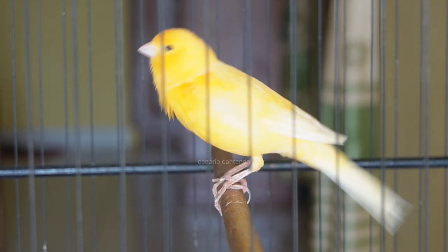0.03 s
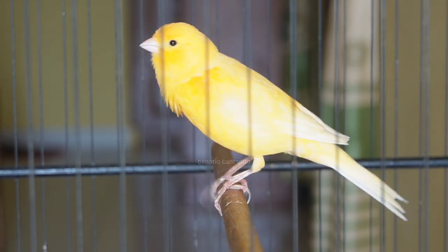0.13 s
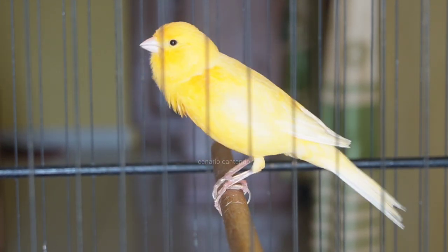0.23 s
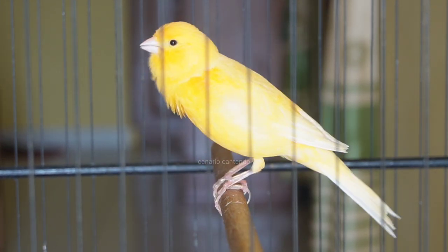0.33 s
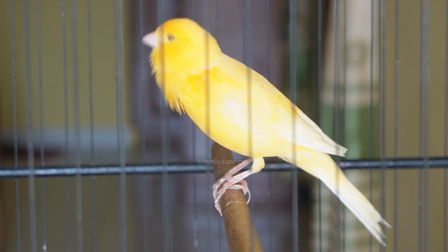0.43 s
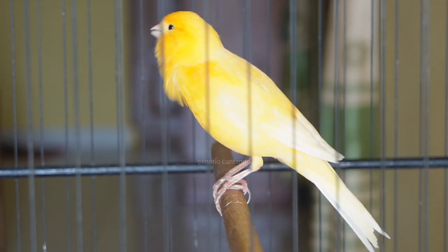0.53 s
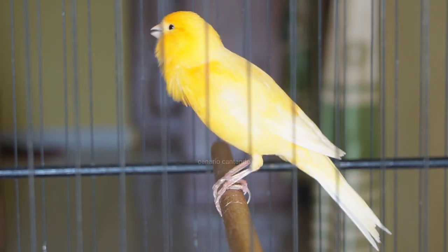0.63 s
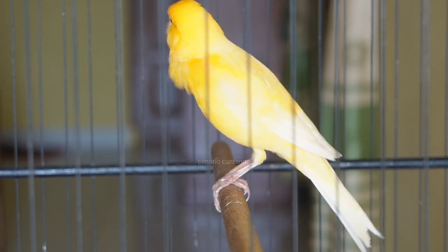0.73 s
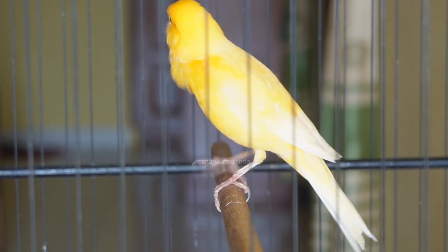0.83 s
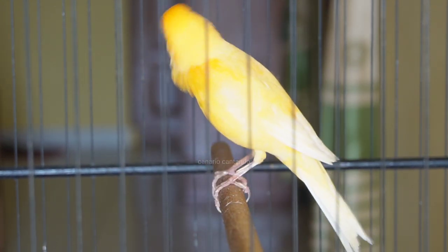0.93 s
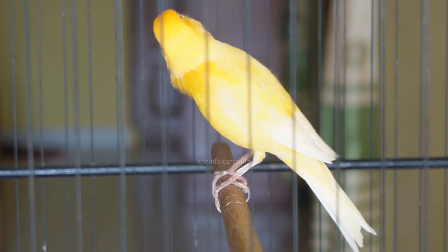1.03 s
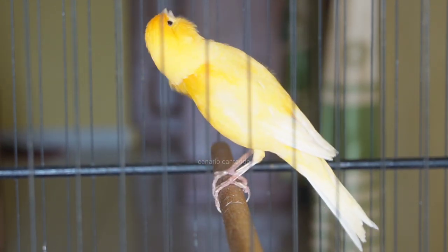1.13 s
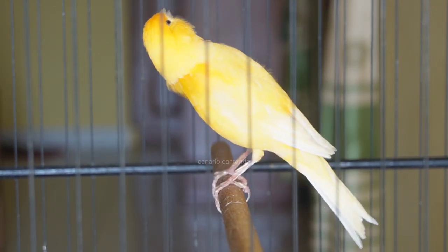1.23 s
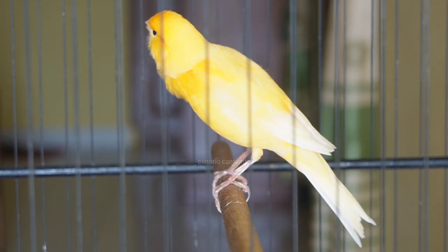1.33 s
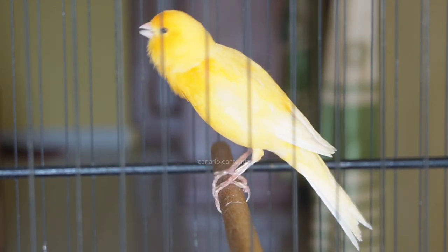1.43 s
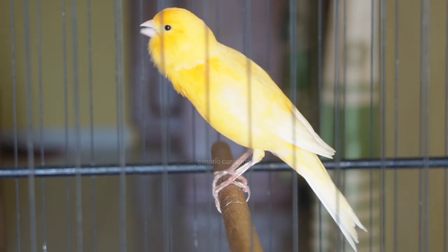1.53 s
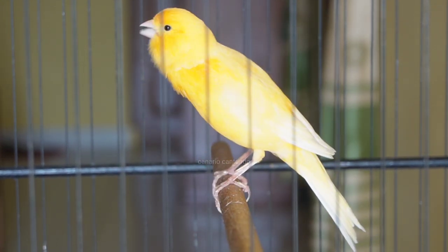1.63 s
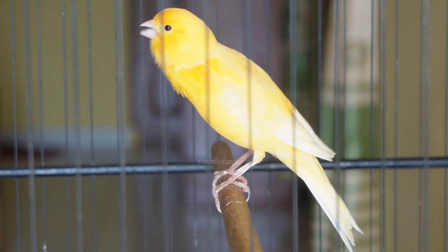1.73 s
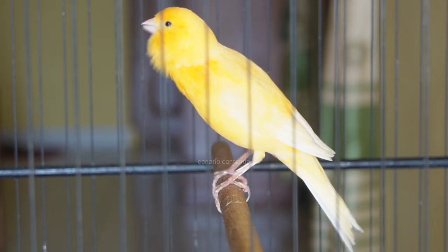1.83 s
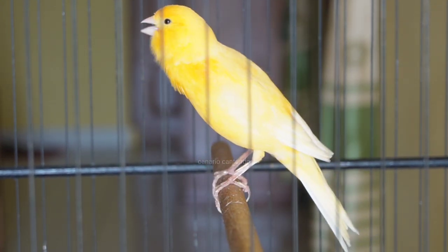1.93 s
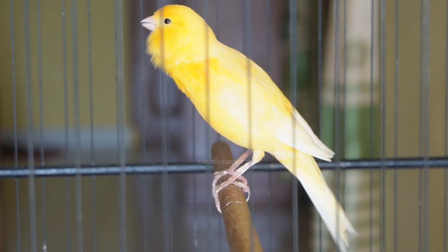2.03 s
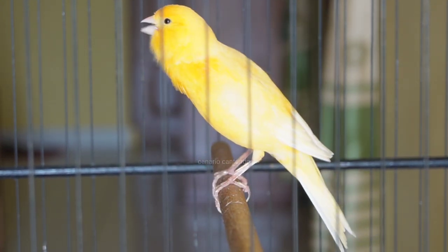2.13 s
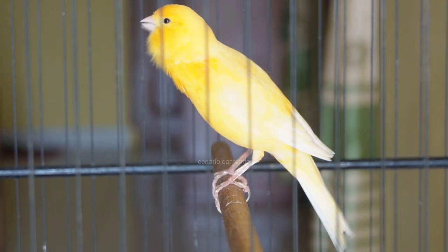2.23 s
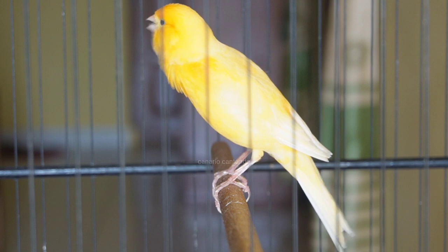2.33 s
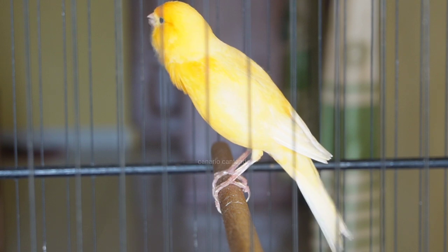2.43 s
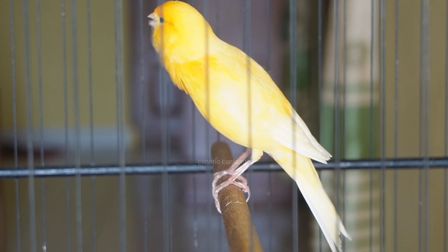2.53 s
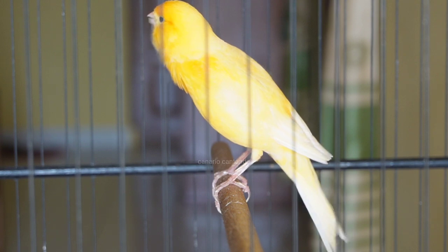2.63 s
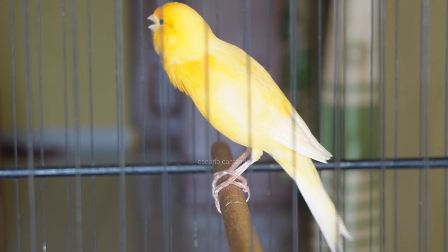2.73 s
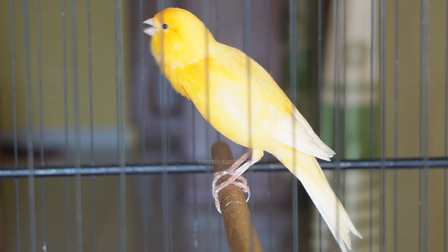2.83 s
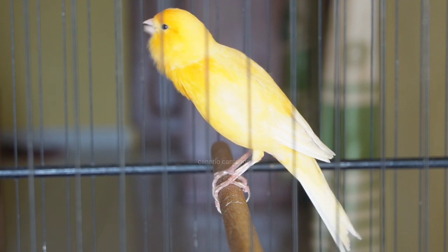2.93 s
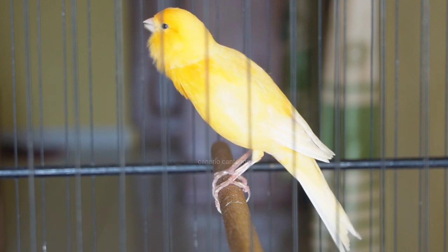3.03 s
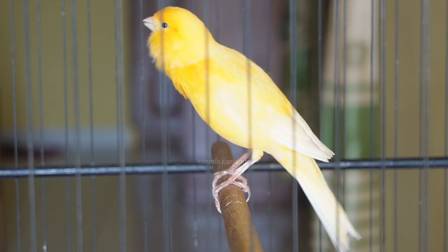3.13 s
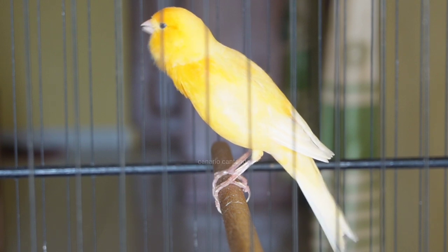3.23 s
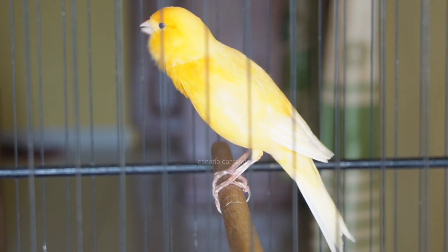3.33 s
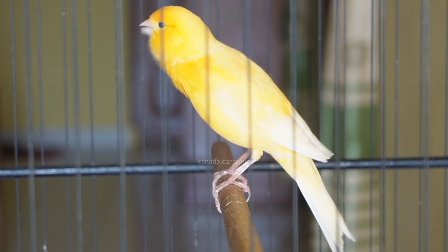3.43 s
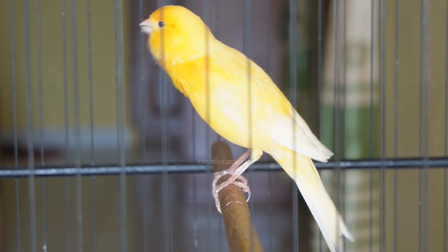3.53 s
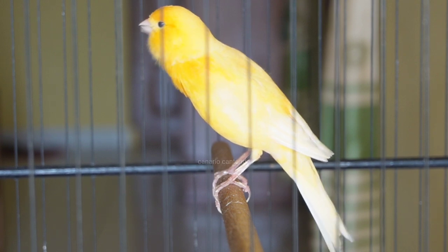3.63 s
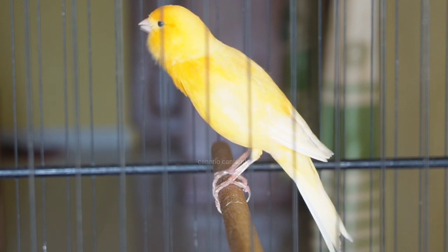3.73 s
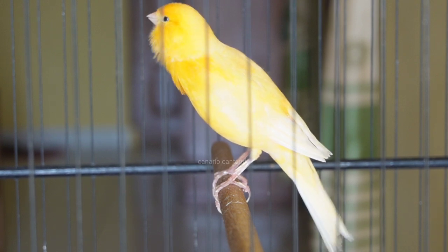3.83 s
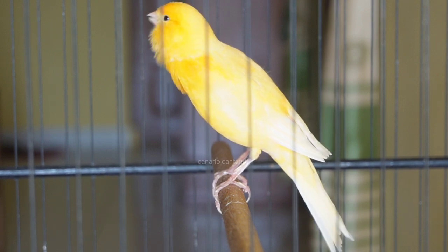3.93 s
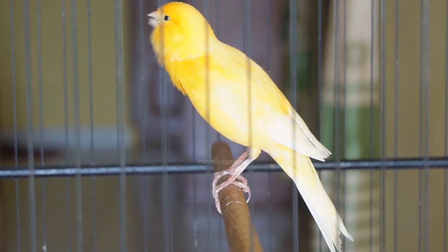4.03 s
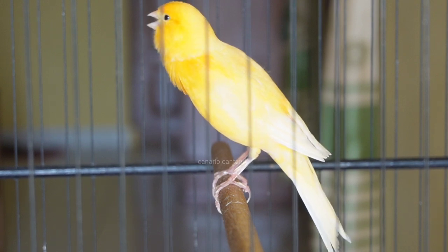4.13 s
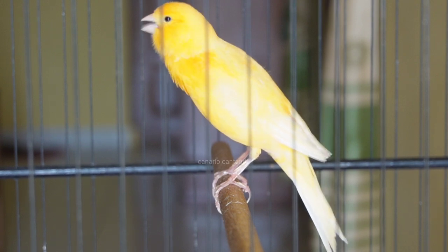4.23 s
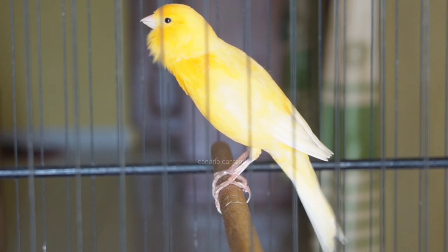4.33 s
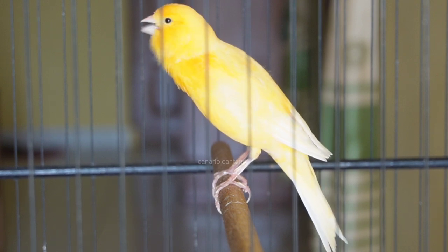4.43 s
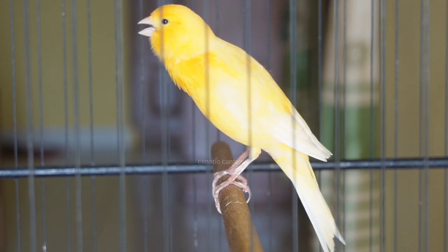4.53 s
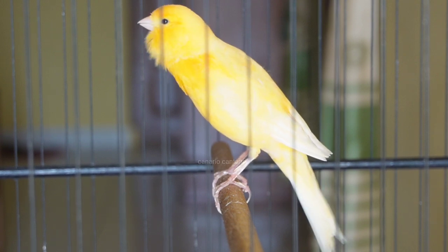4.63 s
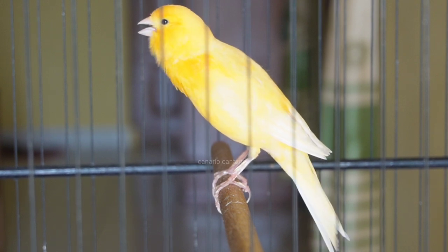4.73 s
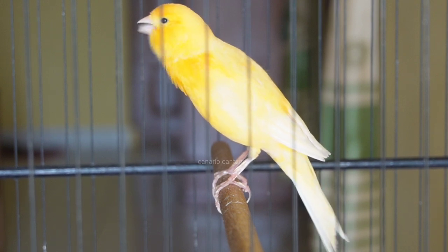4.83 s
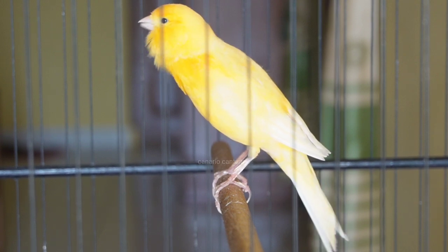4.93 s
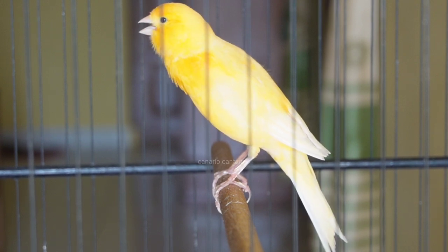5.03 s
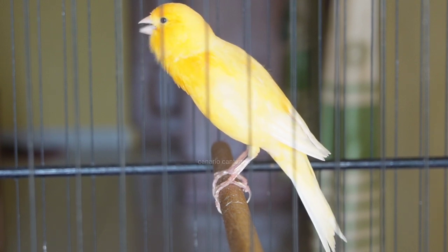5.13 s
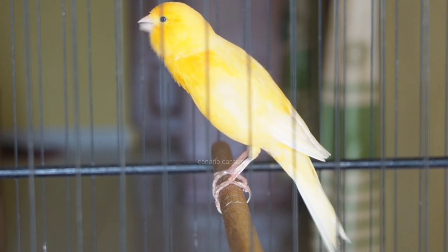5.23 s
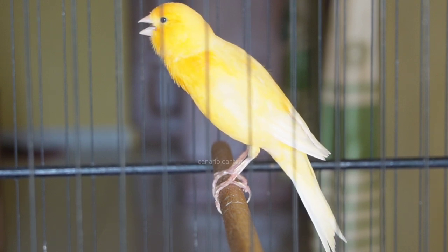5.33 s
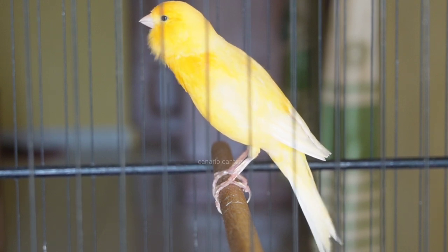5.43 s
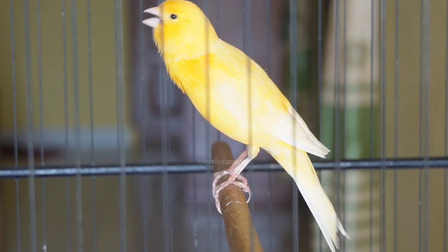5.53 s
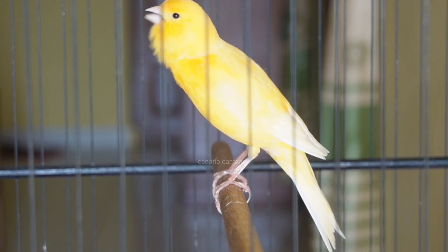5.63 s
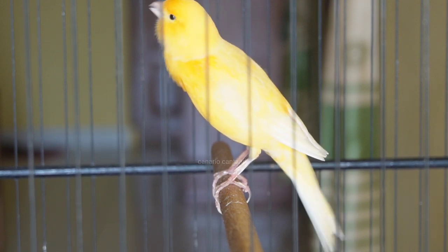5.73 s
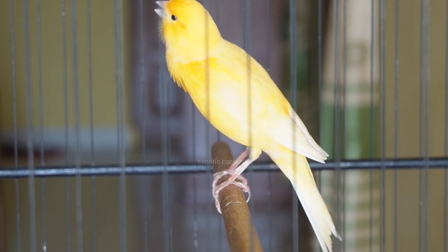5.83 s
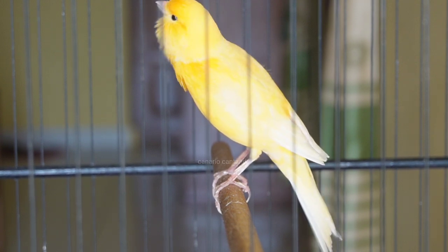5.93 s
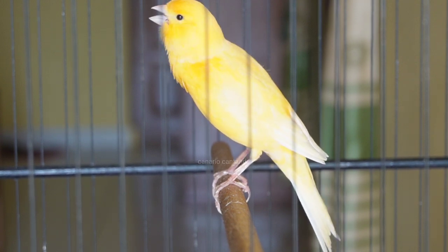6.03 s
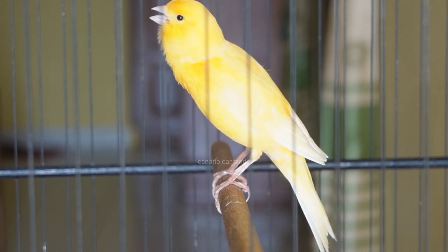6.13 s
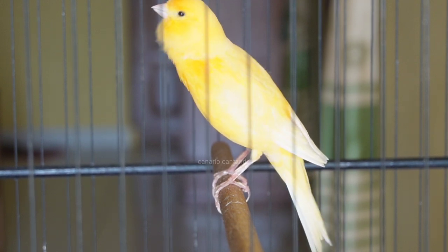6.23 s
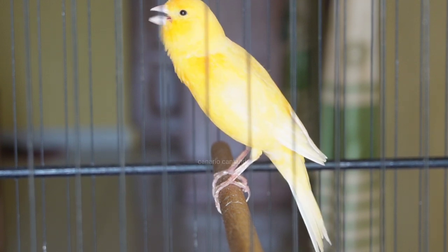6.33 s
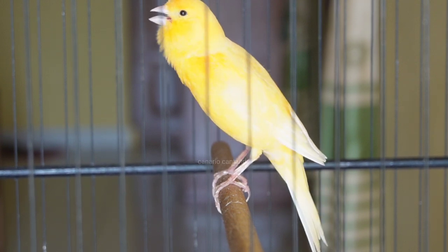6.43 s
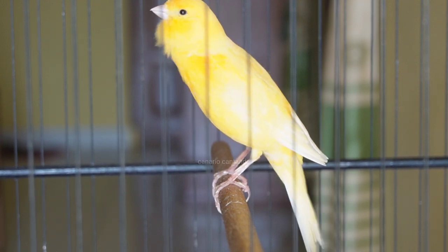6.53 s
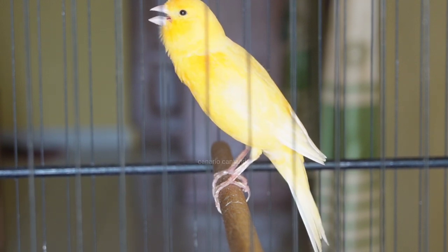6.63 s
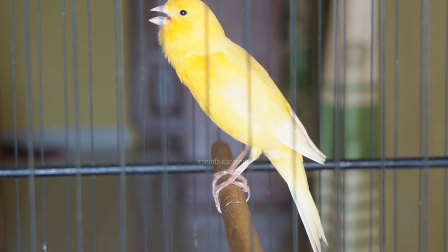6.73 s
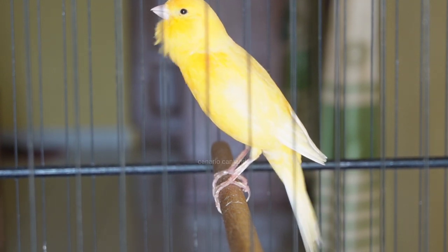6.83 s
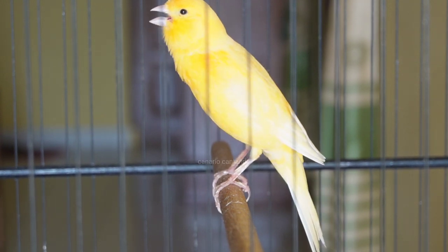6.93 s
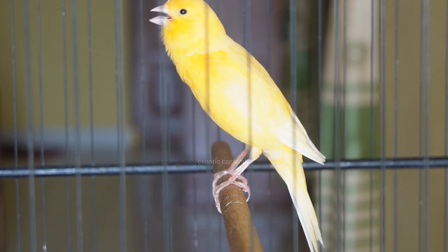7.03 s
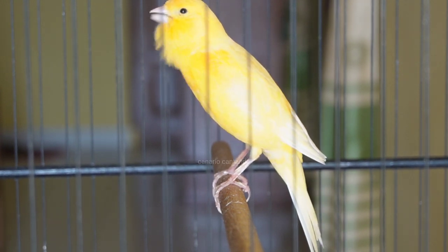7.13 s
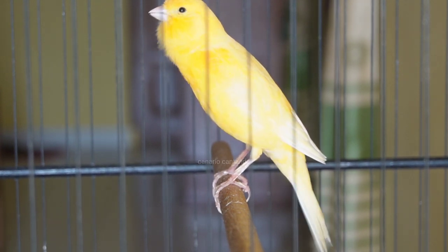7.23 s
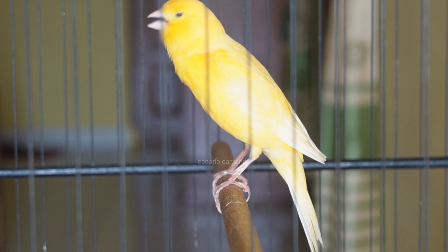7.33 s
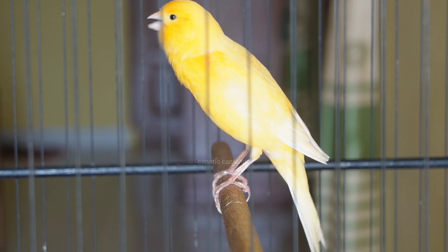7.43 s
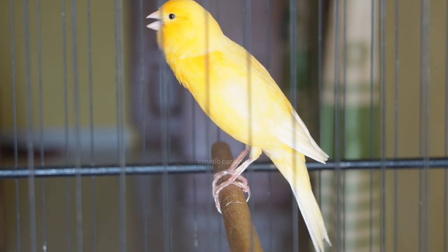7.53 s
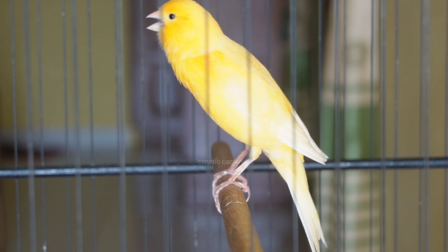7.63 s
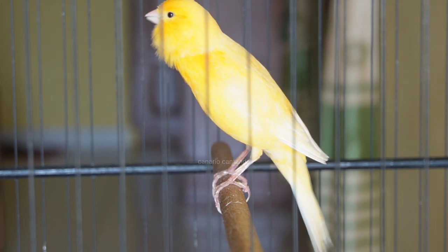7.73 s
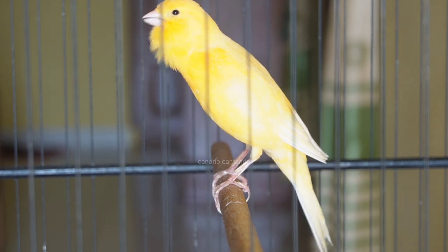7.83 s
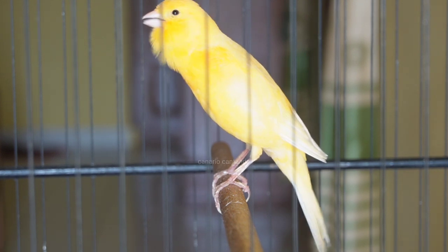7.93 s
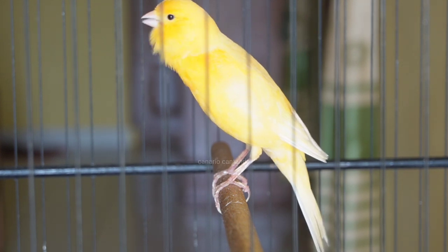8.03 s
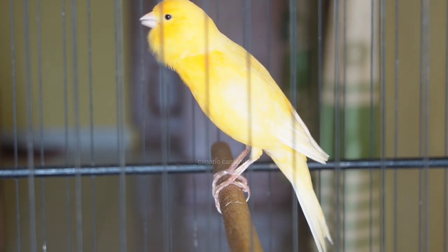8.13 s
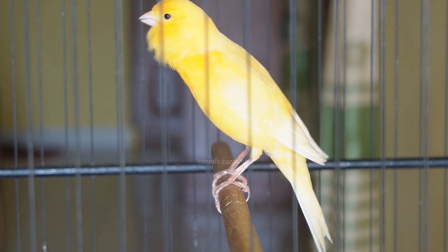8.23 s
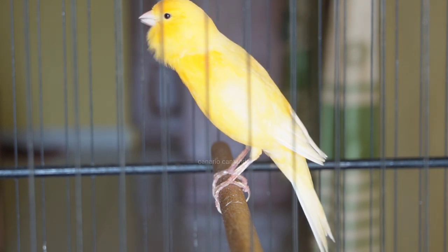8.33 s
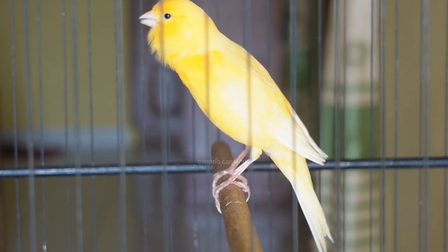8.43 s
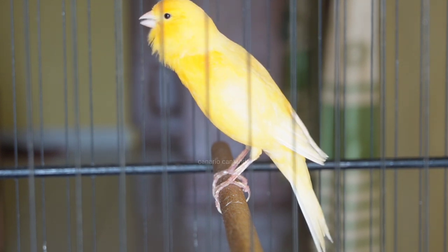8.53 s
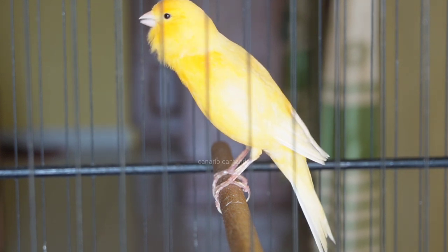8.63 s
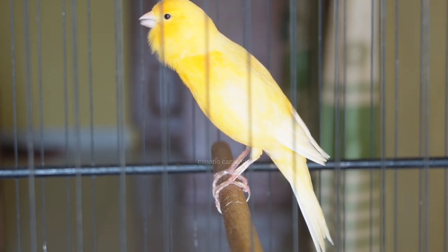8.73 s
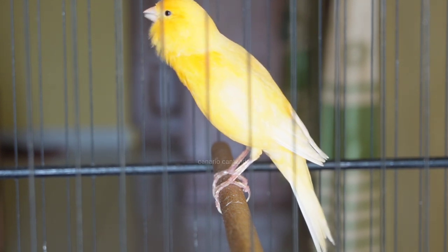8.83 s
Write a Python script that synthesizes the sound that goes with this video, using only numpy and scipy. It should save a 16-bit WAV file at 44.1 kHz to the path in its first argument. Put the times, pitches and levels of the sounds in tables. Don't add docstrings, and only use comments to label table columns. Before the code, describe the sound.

A caged canary sings close by in a small room: quick twitter, slowing roll of falling whistles, long swoops, two rises, fast trill.

```python
import sys
import numpy as np
from scipy import signal
from scipy.fft import rfft, irfft
from scipy.io import wavfile
from scipy.ndimage import uniform_filter1d, minimum_filter1d

SR = 44100
rng = np.random.default_rng(int(sys.argv[2]) if len(sys.argv) > 2 else 0)


def int16_out(signal):
    q = np.round(np.clip(np.atleast_2d(signal).T, -1, 1) * 32767)
    wavfile.write(sys.argv[1], SR, q.astype(np.int16))


def how_loud(loudness_db):
    steps = np.asarray(loudness_db, float) / 20
    return 10 ** steps


N = 392049

# (frequency [Hz], density [dB per Hz])
HOUSE_SPECTRUM = [(20, -25), (40, -14), (62, -5), (190, -1), (400, -8), (1000, -12), (4000, -18),
                  (15600, -35)]
# (frequency [Hz], likeness [0-1])
HOUSE_LIKENESS = [(25, .98), (60, .955), (125, .88), (250, .73), (500, .69), (1000, .75), (4000, .6),
                  (12000, .2)]
# (middle [s], length [s], level over the house noise [dB])
RUSTLES = [
    (0.333, 0.027, 1),
    (6.536, 0.07, 3),
    (7.58, 0.38, 1.5),
    (8.118, 0.035, 3),
]
# (start [s], length [s], frequency [Hz], level [dB], second partial re first [dB])
SQUEAKS = [
    (1.594, 0.16, 786, -67, 3),
    (1.712, .12, 883.6, -67, 10),
    (1.837, 0.584, 944.8, -54.5, -9),
    (6.477, 0.16, 1345, -61.5, -9.5),
    (7.485, 0.094, 958, -53.5, -19.5),
    (7.498, 0.29, 1294, -67.5, -23),
    (6.758, 0.54, 376, -55.5, -16.5),
]
# (left delay [s], left level [dB], right delay [s], right level [dB])
NEAR_ECHOES = [(.00064, -13, .00043, -13), (.001435, -4.5, .001412, -2.5), (.00216, -20, .00217, -13),
               (.00373, -14, .00373, -13), (.00563, -14, .0056, -24), (.00877, -9.5, .00877, -11),
               (.01072, -13, .00937, -14)]
# (frequency [Hz], decay time [s], level [dB], left-right likeness [0-1])
WALLS = [(1780, 0.576, -1, 0.9), (2574, 0.503, -3, 0.92), (3786, 0.4586, -4, 0.79),
         (4800, 0.4173, -0.5, 0.81), (7130, 0.309, 1.5, 0.46), (9840, 0.4, -2, 0.3), (13900, .3, 3.5, 0)]

# (multiple [1], colour as rows of (frequency [Hz], level at full effort [dB]))
OVERTONES = [
    (2, [(5000, -46), (7500, -39.5), (9500, -28), (11000, -29.5), (12300, -44), (13600, -33), (15500, -38.5)]),
    (3, [(7000, -40), (9500, -33.5), (11200, -40.5), (12200, -43), (15500, -37)]),
    (4, [(9000, -68.5), (13500, -61), (14800, -44), (15500, -50)]),
]
# (drop start [s], slide top [Hz], slide level [dB], drop level [dB])
TWITTER = [(0.329, 4705, -47.5, -37.5), (.369, 5500, -39, -28.5), (.412, 4800, -42.5, -29),
           (.455, 5700, -32.5, -27.5), (0.497, 6186, -29.5, -23.5), (0.54, 5900, -30, -23.5),
           (.581, 6480, -31, -22), (.625, 5950, -33, -27.5), (.669, 5970, -28.5, -21.5),
           (0.713, 6390, -30.5, -20.5), (.756, 5300, -28.5, -18.5), (.8, 5930, -29.5, -20.5),
           (0.843, 5500, -29.5, -19.5), (.889, 6020, -31, -20), (0.934, 5800, -30.5, -23),
           (.978, 3920, -39, -17)]
# (start [s], length [s], top pitch [Hz], peak level [dB])
QUICK_ROLL = [(1.01, .026, 6977, -27), (1.055, 0.0237, 7095, -24), (1.102, 0.0207, 6090, -25),
              (1.146, 0.0199, 7120, -22.5), (1.193, 0.0211, 6800, -19.5), (1.241, 0.0212, 6510, -20),
              (1.284, 0.02574, 7080, -17.5), (1.335, 0.0241, 6700, -22.5), (1.384, .021, 6470, -19),
              (1.431, 0.0194, 6990, -19.5), (1.481, 0.0226, 6540, -19.5), (1.523, .029, 7187, -20.5),
              (1.578, .024, 6600, -18.5), (1.625, 0.0276, 7274, -20), (1.673, 0.0271, 7120, -19),
              (1.731, 0.0275, 6915, -20), (1.785, 0.0311, 6895, -17.5)]
# (start [s], peak level [dB])
EVEN_ROLL = [(1.841, -21.5), (1.905, -20), (1.972, -19.5), (2.035, -17.5), (2.1, -19), (2.165, -19),
             (2.231, -18), (2.296, -17), (2.361, -16), (2.428, -19), (2.493, -16.5), (2.558, -16.5),
             (2.625, -18), (2.69, -17), (2.756, -16.5)]
# (start [s], length [s], peak level [dB])
SLOW_ROLL = [(2.824, 0.0557, -13.5), (2.908, 0.0596, -13.5), (2.993, 0.064, -12.5), (3.083, 0.0637, -13),
             (3.173, 0.0688, -11.5), (3.268, 0.06665, -12.5), (3.364, 0.0645, -10), (3.457, 0.0656, -11),
             (3.554, 0.0708, -8.5), (3.652, 0.0731, -12), (3.755, .072, -11), (3.858, 0.0804, -11.5),
             (3.973, 0.07765, -10), (4.087, 0.0791, -11), (4.196, 0.0986, -10), (4.336, 0.104, -10)]
# (time [s], bottom pitch [Hz], sag of mid-note under a straight fall [Hz])
ROLL_RANGE = [(0.999, 2934, 200), (1.299, 3400, 200), (1.8, 3300, 130), (1.83, 2350, 140.5),
              (2.78, 2360, 449), (2.81, 2380, -220), (3.449, 2440, -250), (3.559, 2170, -100),
              (4.35, 2020, -200)]
# (from [s], snap up [Hz], end sag [Hz], mid-fall pause [share of the fall],
# passband as rows of (pitch [Hz], level passed [dB]))
ROLL_THROATS = [
    (1, -1.5, 600.4, -0.018, [(2700, -6.5), (3200, 4.5), (3900, 6.5), (4400, 1), (5200, -10), (6200, -15), (7200, -1)]),
    (1.18, 5.5, 250, 0.0036, [(2800, 10), (3400, 0.5), (3900, 7), (4500, -4), (5200, -14), (6200, -15.5), (7200, -9)]),
    (1.835, 1301.5, 450, 0.0069, [(2000, -16.5), (2700, -1), (3100, 3.5), (3800, 2.5), (4600, -0.5), (5400, -11.5), (6300, -14.5), (7100, -24.5)]),
    (2.8, 399, 653, .012, [(1700, -22.5), (2300, -15.5), (2900, -3.5), (3800, -1.5), (4700, -1), (5500, -8.5), (6300, -19), (7200, -24.5)]),
]
# (start [s], length [s], top pitch [Hz], first slide if it took the whole note [Hz],
# hand-over [share of the note])
FALLS = [(4.479, 0.1015, 7047, 4290, 0.584), (4.624, 0.1111, 7218, 4457, 0.716),
         (4.784, 0.1079, 7246, 4250, 0.427), (4.943, 0.1132, 7014, 4430, 0.466),
         (5.163, 0.12405, 7010, 2500, 0.249), (5.347, 0.1829, 7780, 3478, 0.526),
         (5.582, 0.1935, 7674, 3220, 0.525), (5.837, 0.2121, 7698, 3418, 0.611),
         (6.112, .213, 7614, 4270, 0.57), (6.387, 0.2382, 7593, 4443, 0.573),
         (6.687, 0.2514, 7520, 4201, 0.792), (7.012, .257, 7759, 4582, .78)]
# (from [s], passband as rows of (pitch [Hz], level passed [dB]))
FALL_THROATS = [
    (4.4, [(2150, -12.5), (3000, -5), (3950, -2.5), (4750, -2), (5450, -12.5), (6200, -19.5), (6600, -29), (7100, -24)]),
    (5.1, [(2100, -17), (2900, -6.5), (3600, -2.5), (4500, 0), (5400, -10.5), (6200, -13.5), (6900, -20), (7600, -23)]),
    (6.3, [(2100, -20), (2900, -5.5), (3600, 1.5), (4600, -1), (5400, -6.5), (5800, -14), (6300, -18.5), (7500, -22)]),
]
# (start [s], length [s], first pitch [Hz], peak level [dB])
RISES = [
    (7.343, 0.184, 3150, -10),
    (7.573, .189, 3163, -10),
]
# (pitch [Hz], level passed [dB])
RISE_THROAT = [(2800, -9.5), (3850, -3), (4550, 0), (5450, -10), (6000, -7), (6270, -11.5)]
# (start [s], first pitch [Hz], peak level [dB])
TRILL = [(7.802, 2427, -12), (7.849, 2986, -9.5), (7.892, 2628, -10), (7.934, 2198, -9), (7.98, 2324, -7.5),
         (8.024, 2156, -8), (8.068, 2178, -7.5), (8.114, 2203, -7.5), (8.159, 2281, -6),
         (8.205, 2058, -4.5), (8.25, 2040, -5.5), (8.296, 1961, -5.5), (8.342, 1959, -3.5),
         (8.387, 2003, -5.5), (8.433, 2025, -6), (8.479, 2097, -5.5), (8.526, 2104, -6),
         (8.571, 2159, -5.5), (8.617, 2048, -4.5), (8.662, 2021, -5), (8.71, 2041, -5), (8.757, 1771, -5.5),
         (8.805, 2039, -4.5), (8.855, 1986, -4.5)]
# (pitch [Hz], level passed [dB])
TRILL_THROAT = [(1900, -27.5), (2500, -13), (3100, -5.5), (3500, -2.5), (3800, 7)]

SLIDE_HZ_PER_S, SLIDE_END_HZ, DROP_S, DROP_HZ = 190000, 3997, 0.0056, 1150
EVEN_NOTE_S, ROLL_TOP_HZ = 0.0415, 7154
FALL_BOTTOM_HZ, FALL_BEND, FALL_DIP_HZ = 2238, 1.2, 58.86
FALL_DB, FALL_SWELL_DB_PER_S = -8.5, 0.59
RISE_TOP_HZ, RISE_BEND, RISE_HOLD_S, RISE_SNAP_HZ = 6201, 2.4, 0.008, 500
TRILL_TOP_HZ, TRILL_CLIMB_S, TRILL_SPAN_HZ, TRILL_ROUND = 3715.2, 0.021, 1685, 0.25
TRILL_FADE_DB, TRILL_SNAP_HZ = 5.5, 148


def table(points, hz):
    rows = np.array(points, float)
    return np.interp(np.log(np.maximum(hz, 1)), np.log(rows[:, 0]), rows[:, 1])


def pair(length, like, gain):
    hz = np.fft.rfftfreq(length, 1 / SR)
    mid, side = rfft(rng.standard_normal((2, length)))
    likeness = np.clip(like(hz), 0, 1)
    mid = mid * np.sqrt((1 + likeness) / 2)
    side = side * np.sqrt((1 - likeness) / 2)
    return irfft(gain(hz) * np.array([mid + side, mid - side]), length)


def walk(rate):
    hold = int(SR / rate)
    levels = np.repeat(rng.standard_normal(N // hold + 1), hold)
    slewed = uniform_filter1d(uniform_filter1d(levels, hold), hold)
    return 1.3 * slewed[:N]


def house():
    noise = pair(N, lambda f: table(HOUSE_LIKENESS, f), lambda f: how_loud(table(HOUSE_SPECTRUM, f)))
    noise = noise / np.sqrt(np.mean(noise ** 2))
    breath_db = 0.6 * walk(3)
    t = np.arange(N) / SR
    for middle, length, db in RUSTLES:
        breath_db = breath_db + db * np.exp(-((t - middle) / length) ** 2)
    return noise * how_loud(-48.5 + breath_db)


def room():
    length = SR // 2
    t = np.arange(length) / SR
    response = np.zeros((2, length))
    response[:, 0] = how_loud(2.1336), how_loud(2.54)
    for left_s, left_db, right_s, right_db in NEAR_ECHOES:
        response[[0, 1], [int(left_s * SR), int(right_s * SR)]] += how_loud(left_db), how_loud(right_db)
    centres = [row[0] for row in WALLS]
    for k, (hz, t60, db, like) in enumerate(WALLS):
        band = lambda f: np.sqrt(np.interp(f, centres, np.eye(len(WALLS))[k]))
        fade = np.exp(-np.log(1000) * t / t60) * np.minimum(t / 0.004, 1)
        fade = fade / np.sqrt(np.sum(fade ** 2))
        response += how_loud(db) * pair(length, lambda f: like + 0 * f, band) * fade
    return response


def squeaks():
    out = np.zeros(N)
    flicker = walk(130) + 1j * walk(130) + 0.3
    for start, length, hz, db, second_db in SQUEAKS:
        i = np.arange(int(start * SR), int((start + length) * SR))
        swell = np.sin(np.linspace(0, np.pi, len(i))).clip(0) ** 0.34
        tone = np.exp(2j * np.pi * hz * i / SR)
        partials = tone + how_loud(second_db) * tone ** 2
        out[i] += how_loud(db) * swell * np.real(flicker[i - rng.integers(SR)] * partials)
    return out


def hooks(n, rise_hz, fall_hz):
    t = np.arange(n) / SR
    snap = rise_hz * np.exp(-(t / 0.0022) ** 2)
    sag = fall_hz * np.exp(-t[::-1] / 0.003)
    return -snap - sag


def arc(length, first, middle, last):
    u = np.arange(int(length * SR)) / (length * SR)
    ends = first * (1 - u) * (1 - 2 * u) + last * u * (2 * u - 1)
    return ends + 4 * middle * u * (1 - u)


def twitter():
    notes = []
    for drop_s, top_hz, slide_db, drop_db in TWITTER:
        length = (top_hz - SLIDE_END_HZ + 550) / SLIDE_HZ_PER_S
        u = np.linspace(0, 1, int(length * SR))
        slide = SLIDE_END_HZ + (top_hz - SLIDE_END_HZ) * (1 - u) ** 2
        notes.append((drop_s - length, slide, slide_db - 3 - 9 * u ** 3.9, slide_db, 0.0018))
        u = np.linspace(0, 1, int(DROP_S * SR))
        drop = SLIDE_END_HZ - 50 - DROP_HZ * u
        notes.append((drop_s, drop, drop_db + 0.18 - 3 * u, drop_db - 11, 0.0018))
    return notes


def roll():
    rows = list(QUICK_ROLL)
    rows += [(start, EVEN_NOTE_S, ROLL_TOP_HZ, db) for start, db in EVEN_ROLL]
    rows += [(start, length, ROLL_TOP_HZ, db) for start, length, db in SLOW_ROLL]
    times, bottoms, hangs = np.transpose(ROLL_RANGE)
    notes = []
    for start, length, first, db in rows:
        _, rise_hz, fall_hz, pause, throat = [row for row in ROLL_THROATS if row[0] <= start][-1]
        last = np.interp(start, times, bottoms)
        middle = (first + last) / 2 - np.interp(start, times, hangs)
        pitch = arc(length, first, middle, last)
        pitch = pitch - pause * (first - last) * np.sin(np.linspace(0, 2 * np.pi, len(pitch)))
        lead = int(rise_hz / 10)
        pitch = np.append(np.full(lead, first), pitch)
        pitch = pitch + hooks(len(pitch), rise_hz, fall_hz)
        slap_db = 13 * np.exp(-np.arange(len(pitch)) / (0.007 * SR)) - 2.5
        notes.append((start - lead / SR, pitch, db + table(throat, pitch), db + slap_db, 0.0027))
    return notes


def falls():
    notes = []
    for start, length, top, slide, knee in FALLS:
        throat = [row[1] for row in FALL_THROATS if row[0] <= start][-1]
        db = FALL_DB + FALL_SWELL_DB_PER_S * (start - FALLS[0][0])
        u = np.linspace(0, 1, int(length * SR))
        upper = np.minimum(u / knee, 1)
        lower = np.maximum(u - knee, 0) / (1 - knee)
        pitch = top - slide * u - FALL_DIP_HZ * np.sin(np.pi * upper)
        pitch = pitch - (top - slide - FALL_BOTTOM_HZ) * lower ** FALL_BEND
        blip_db = 9 * np.exp(-(u * length / 0.00242) ** 2)
        level_db = db + table(throat, pitch) + blip_db
        notes.append((start, pitch + hooks(len(u), 560, 480), level_db, db, 0.0034))
    return notes


def rises():
    notes = []
    for start, length, first, db in RISES:
        u = np.minimum(np.arange(int((length + RISE_HOLD_S) * SR)) / (length * SR), 1)
        pitch = RISE_TOP_HZ - (RISE_TOP_HZ - first) * (1 - u) ** RISE_BEND
        level_db = db + table(RISE_THROAT, pitch)
        notes.append((start, pitch + hooks(len(u), RISE_SNAP_HZ, 0), level_db, db - 1, 0.0025))
    return notes


def trill():
    notes = []
    for start, first, db in TRILL:
        span = TRILL_TOP_HZ - first
        top = TRILL_TOP_HZ * (1 + 0.008 * rng.standard_normal())
        climb_s = TRILL_CLIMB_S * np.sqrt(span / TRILL_SPAN_HZ)
        pitch = arc(climb_s, first, top - TRILL_ROUND * span, top)
        pitch = np.append(pitch, np.full(int(0.0038 * SR), top))
        fade_db = TRILL_FADE_DB * np.linspace(0, 1, len(pitch)) ** 3.3
        pitch = pitch + hooks(len(pitch), TRILL_SNAP_HZ, 0)
        level_db = db + 0.5 + table(TRILL_THROAT, pitch) - fade_db
        notes.append((start, pitch, level_db, db - 0.5, 0.003))
    return notes


def add(tracks, start, pitch, db, effort_db, edge):
    i, n = int(start * SR), len(pitch)
    ramp = np.minimum(np.arange(n), np.arange(n)[::-1]) / (edge * SR)
    soft = np.sin(np.pi / 2 * np.minimum(ramp, 1)) ** 2
    note = np.array([pitch, how_loud(db) * soft, how_loud(effort_db) * soft])
    tracks[:, i:i + n] = note[:, :N - i]


def canary():
    tracks = np.zeros((3, N))
    tracks[0] = 3000
    for note in twitter() + roll() + falls() + rises() + trill():
        add(tracks, *note)
    hz, gain, effort = tracks
    hz = hz * (1 + 0.002 * walk(300))
    phase = 2 * np.pi * np.cumsum(hz) / SR
    flutter_db = 2.12 * walk(150) + 0.5 * walk(35)
    voice = gain * how_loud(flutter_db) * np.sin(phase)
    throat_gain = gain / (effort + 1e-9)
    for k, colour in OVERTONES:
        patchy_db = 2.2 * walk(70)
        share = how_loud(table(colour, k * hz) + patchy_db) * (k * hz < SR / 2.4)
        drive = effort ** (1.401 + 0.4 * (k - 2)) * throat_gain ** (0.74 * (k - 1))
        voice = voice + drive * share * np.sin(k * phase)
    haze_band = signal.butter(4, [8200, 14500], "band", fs=SR, output="sos")
    air = signal.sosfilt(haze_band, rng.standard_normal(N))
    return voice + how_loud(-66) * effort * air


def scene():
    sources = canary() + squeaks()
    return signal.fftconvolve(sources[None], room(), axes=1)[:, :N] + house()


def band_limit(x):
    return signal.sosfilt(signal.butter(12, 15700, fs=SR, output="sos"), x)


def record(dry):
    loud = signal.lfilter([1 / 30000], [1, 1 / 30000 - 1], np.mean(dry ** 2, axis=0))
    held = dry / (1 + (loud / how_loud(-21.5)) ** 2) ** 0.348
    peak = np.abs(held).max(axis=0) + 1e-9
    limit = np.minimum(1, (how_loud(-2.1043) / peak) ** 1.34)
    gain = uniform_filter1d(minimum_filter1d(limit, size=180), size=180)
    treble_cut = signal.ellip(8, 0.2, 60, 15650, fs=SR, output="sos")
    mix = signal.sosfilt(treble_cut, held * gain)
    return band_limit(mix)


dry = scene()
out = record(dry)
int16_out(out)
```